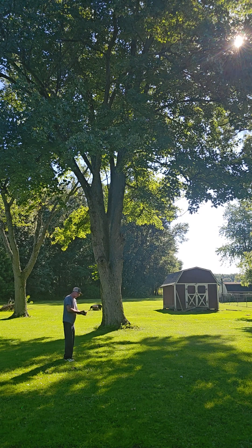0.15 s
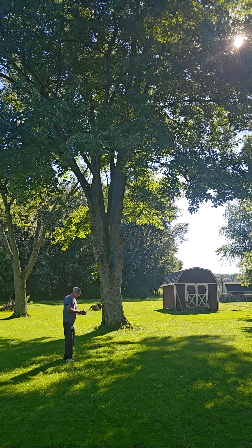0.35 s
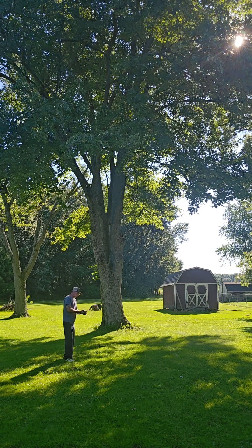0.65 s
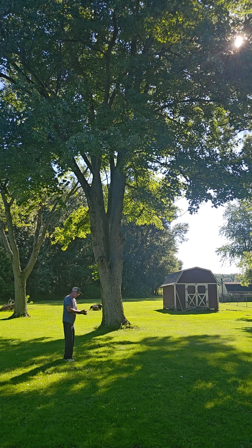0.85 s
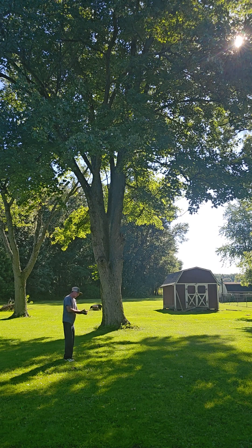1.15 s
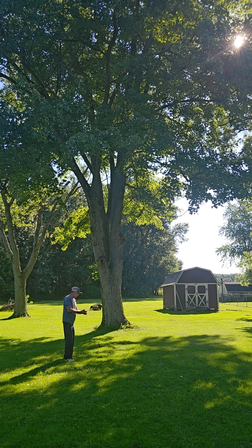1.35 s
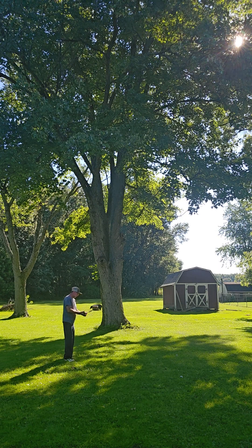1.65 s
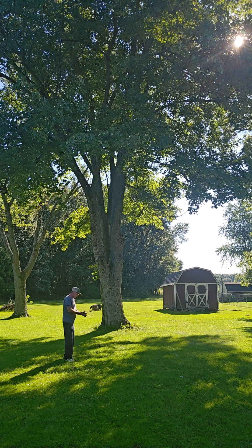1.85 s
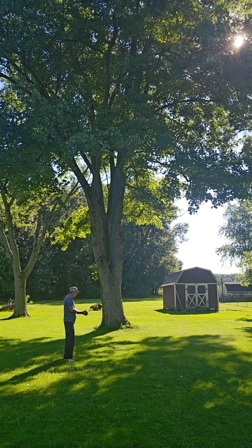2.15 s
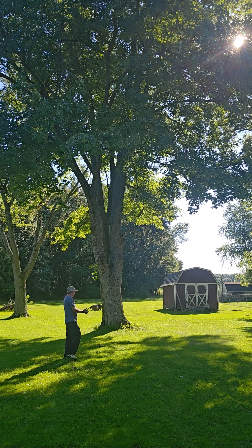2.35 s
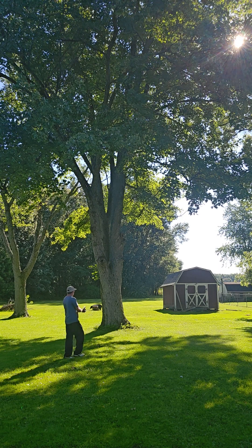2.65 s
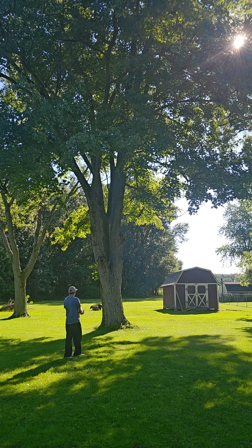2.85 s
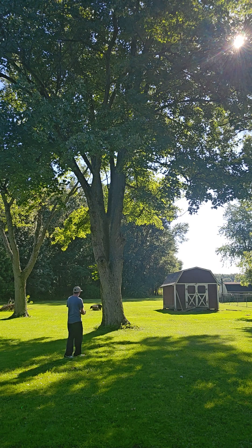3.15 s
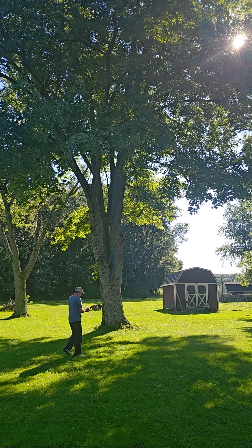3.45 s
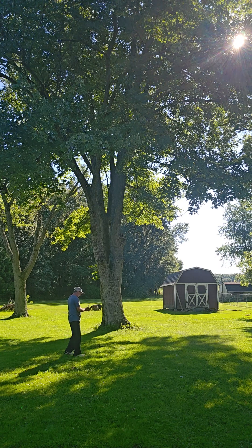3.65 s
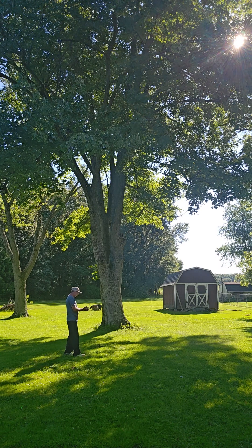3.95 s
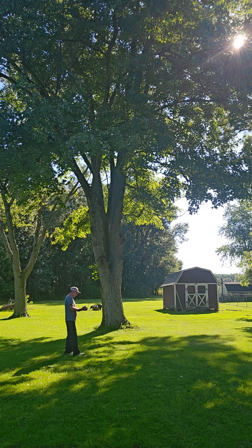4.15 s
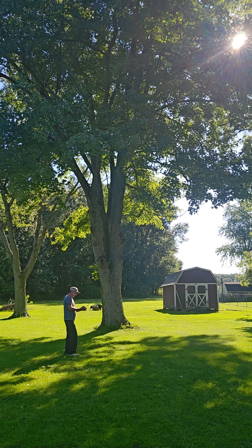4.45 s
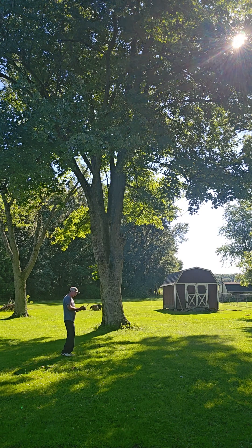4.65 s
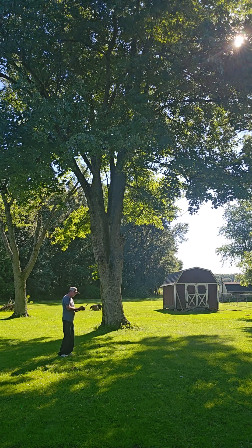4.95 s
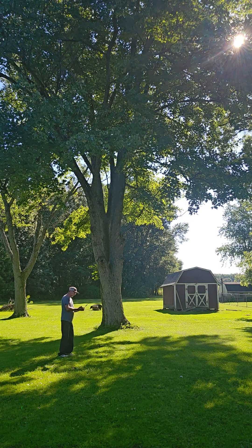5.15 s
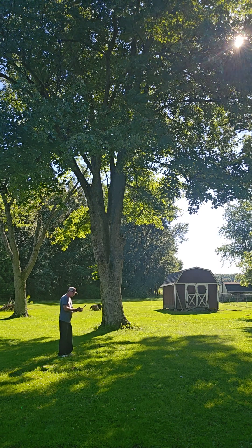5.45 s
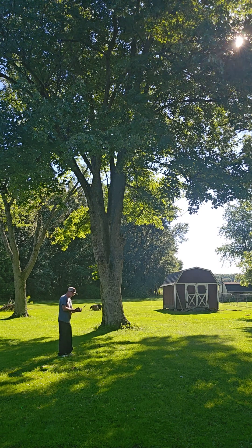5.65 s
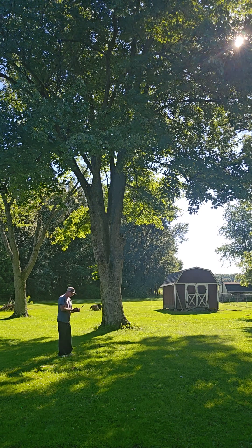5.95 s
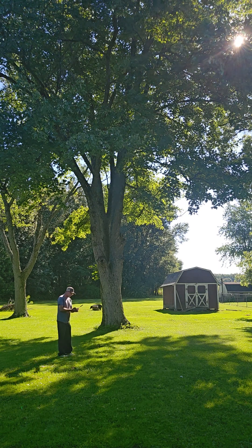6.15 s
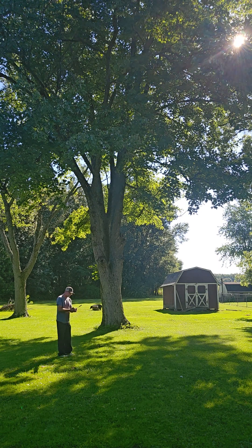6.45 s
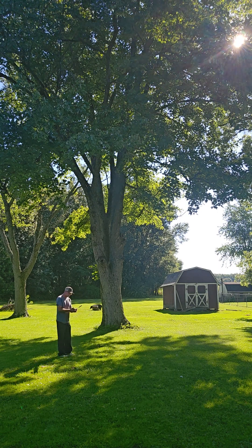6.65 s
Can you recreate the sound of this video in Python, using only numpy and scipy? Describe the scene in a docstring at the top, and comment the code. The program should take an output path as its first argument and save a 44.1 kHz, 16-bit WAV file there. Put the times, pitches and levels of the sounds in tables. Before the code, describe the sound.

A man on a tree-shaded lawn strokes a turkey pot call some metres from the microphone. Short high whistles drop into increasingly raspy yelps in the first second and a half; after a gap comes one rough yelp, then several faint, clear whistles. Lawn and trees return a light echo. Underneath lie quiet low air rumble, a wavering distant engine, leaf and cricket hiss and tiny insect ticks.

```python
"""A turkey pot call is played on a lawn, some way from the microphone: a striker sticks and slips on the plate.
Each stroke lands high and settles on a whistle; pressed harder, it drops, splits and rasps into a yelp.
It rises again as the tip lifts; lawn and trees answer with decaying noise echoes.
Wavering sines make a distant engine drone; coloured noise makes the rumble, the leaves and the insects,
which sizzle and tick in the grass."""
import sys
import numpy as np
from scipy import signal
from scipy.fft import rfft, irfft, next_fast_len
from scipy.io import wavfile
from scipy.ndimage import uniform_filter1d, map_coordinates

SR = 44100
rng = np.random.default_rng(int(sys.argv[2]) if len(sys.argv) > 2 else 0)


def wav_out(sig):
    """Save sig, one row per channel (or a flat mono array), as 16-bit PCM at SR to the path in sys.argv[1]."""
    wavfile.write(sys.argv[1], SR, np.round(np.clip(np.atleast_2d(sig).T, -1, 1) * 32767).astype(np.int16))


N = 299437
TIME = np.arange(N) / SR  # s


def amp(db):
    """Decibels to gain."""
    return 10 ** (np.asarray(db) / 20)


def unit(x):
    """Scaled to rms 1."""
    return x / np.sqrt(np.mean(x ** 2) + 1e-20)


def along(points, hz):
    """(frequency, value) points read on a log frequency axis."""
    f, v = np.transpose(points)
    return np.interp(np.log(hz + 1), np.log(f + 1), v)


def lookup(rows, x):
    """Each later column of a table, read where its first column equals x."""
    first, *cols = np.transpose(rows)
    return [np.interp(x, first, col) for col in cols]


def wobble(rate):
    """A smooth random curve, rate knots a second."""
    knots = rng.standard_normal(int(N * rate / SR) + 4)
    return map_coordinates(knots, [TIME * rate])


def filtered(x, response):
    """x passed through a complex response of frequency."""
    size = next_fast_len(N + SR // 2)
    spectrum = rfft(x, size) * response(np.fft.rfftfreq(size, 1 / SR))
    return irfft(spectrum, size)[..., :N]


def tone(hz):
    """A sine of rms 1 that follows a pitch curve."""
    cycles = np.cumsum(hz) / SR + rng.random()
    return np.sqrt(2) * np.sin(2 * np.pi * cycles)


def rush(spectrum):
    """Coloured stereo noise of rms 1: a mid and a side noise share the power by left-right likeness."""
    # likeness of the two sides: (frequency [Hz], correlation [-1 to 1])
    likeness = [(60, 0.95), (130, 0.95), (290, 0.93), (640, 0.95), (1410, 0.75), (3100, 0.082),
                (6820, -0.2), (15000, 0.75)]

    def mid_and_side(hz):
        turn = np.arccos(np.clip(along(likeness, hz), -1, 1)) / 2
        return amp(along(spectrum, hz)) * np.array([np.cos(turn), np.sin(turn)])

    mid, side = filtered(rng.standard_normal((2, N)), mid_and_side)
    return unit(np.array([mid + side, mid - side]))


def bouts(rows, rest_db, edge_s):
    """A level in dB that rises from rest during each (start, end, level) row, with soft edges."""
    level = rest_db
    for start, end, db in rows:
        inside = (np.tanh((TIME - start) / edge_s) - np.tanh((TIME - end) / edge_s)) / 2
        level = level + (db - rest_db) * inside
    return level


def far_air(level_db=-53):
    """Far traffic and breeze: low noise whose level drifts slightly."""
    # colour of the far air: (frequency [Hz], relative density [dB per Hz])
    air_colour = [(12, -31.5), (20, -14.5), (49, -2.5), (97, -2), (124, -9), (138, -6), (155, -7),
                  (166, -5.5), (183, -16), (208, -15.5), (224, -31), (414, -27.5), (446, -23), (855, -17.5),
                  (1700, -31), (2210, -60.5), (3740, -120)]
    return amp(level_db + 0.6 * wobble(9.2)) * rush(air_colour)


def rumble(rest_db=-70, trim_db=-4):
    """A low rumble: narrow bands of noise that swell now and then."""
    # swells, before the trim: (start [s], end [s], level [dB])
    rumble_swells = [(.55, 1.4, -58.5), (2.33, 2.65, -57.5), (4.4, 4.65, -64)]
    # colour: (frequency [Hz], relative density [dB per Hz])
    rumble_colour = [(165, -22.5), (198, 2), (240, -7), (320, -13), (430, -4), (520, -25), (1200, -90)]
    level_db = bouts(rumble_swells, rest_db, edge_s=.07) + 1.5 * wobble(4) + trim_db
    return amp(level_db) * rush(rumble_colour)


def leaves(level_db=-65.5, pan_db=1.0):
    """Leaves and crickets: a soft, slowly drifting hiss, a little stronger on the left."""
    # colour: (frequency [Hz], relative density [dB per Hz])
    leaf_colour = [(1000, -27), (1700, -25), (2050, -3.5), (2220, -6.5), (2430, -14), (3310, -10.5),
                   (3930, -10), (4520, -7), (4870, 1), (5650, 4), (6750, -3), (8880, -6), (10000, -47),
                   (13000, -45), (15500, -48), (22000, -120)]
    hiss = amp(level_db + .6 * wobble(1.8)) * rush(leaf_colour)
    return hiss * amp([[pan_db], [-pan_db]])


def engine(drone_hz=153.3, rest_db=-65, trim_db=-1):
    """A far engine: one wavering low tone that swells, over other low tones that drift without set swells."""
    # swells of the main tone, before the trim: (start [s], end [s], level [dB])
    drone_swells = [(-.2, .3, -54), (1.12, 2.03, -52.5), (2.55, 3.0, -53), (3.2, 3.95, -51.5),
                    (4.35, 5.98, -54)]
    # other low tones, each drifting about: (frequency [Hz], level [dB])
    drone_lines = [(54.5, -62), (109, -60.5), (196.5, -68.5)]
    lines = sum(amp(level + 3.5 * wobble(2.7)) * tone(f * (1 + .008 * wobble(3.7)))
                for f, level in drone_lines)
    drone_db = bouts(drone_swells, rest_db, edge_s=.08) + trim_db
    drone = amp(drone_db) * tone(drone_hz * (1 + .004 * wobble(4)))
    return drone + lines


def insects(rest_db=-84, sizzle_trim_db=-1, pulse_hz=33, tick_trim_db=-8, tick_s=.007):
    """A pulsing high sizzle of wings, with a few louder single strokes, all cut from one high noise."""
    # bouts of song, before the trim: (start [s], end [s], level [dB])
    sizzle_bouts = [(.1, 1.2, -78), (2.65, 3.85, -72), (3.85, 4.95, -78), (5.7, 7, -72)]
    # ticks, before the trim; each peaks tick_s after its time: (time [s], level [dB])
    tick_times = [(2.2568, -57), (2.4631, -59), (5.5263, -61.5), (5.6228, -54), (5.7125, -57),
                  (5.7938, -62.5)]
    # colour: (frequency [Hz], relative density [dB per Hz])
    insect_colour = [(9500, -26), (10800, -6), (12300, 4), (13800, -3), (15600, -14)]
    pulse = 1 + 0.3 * tone(pulse_hz * (1 + 0.12 * wobble(11)))
    sizzle = amp(bouts(sizzle_bouts, rest_db, edge_s=.15) + sizzle_trim_db) * pulse
    ticks = sum(amp(db + tick_trim_db) * np.exp(-((TIME - s - tick_s) / tick_s) ** 2)
                for s, db in tick_times)
    return (sizzle + ticks) * rush(insect_colour)


def yard(x, near_db=-18, near_t60=0.19, far_db=-28.5, patchy_db=3, treeline_s=0.45, treeline_db=7):
    """Quick scatter from the lawn and trunk, then a faint long answer from the trees, as decaying noise."""
    # decay of the far answer: (frequency [Hz], time to fall 60 dB [s])
    far_decay = [(300, 0.32), (1100, 1.1), (2200, 1.65), (4200, 1.35), (9000, 0.81)]
    hz, frames, z = signal.stft(rng.standard_normal((2, SR * 3 // 2)), SR, nperseg=256)
    fading = amp(-60 * frames / along(far_decay, hz)[:, None])
    far = signal.istft(z * fading, SR, nperseg=256)[1]
    t = np.arange(far.shape[1]) / SR
    # the far answer is patchy, rising and falling at random, and the far tree line adds one late swell
    treeline = treeline_db * np.exp(-((t - treeline_s) / 0.097) ** 2)
    lumps_db = patchy_db * wobble(25)[:len(t)] + treeline
    far = far * (1 - np.exp(-t / 0.02027)) * amp(lumps_db)
    near = rng.standard_normal(far.shape) * amp(-60 * t / near_t60) * (1 - np.exp(-t / 0.0097))
    near = amp(near_db) * near / np.linalg.norm(near[0])
    far = amp(far_db) * far / np.linalg.norm(far[0])
    return signal.fftconvolve(x[None], near + far, axes=1)[:, :N]


def placed(x):
    """The direct sound reaches the two microphone ports at different times and strengths."""
    # phase between the ports: (frequency [Hz], lead of the left [rad])
    left_lead = [(1300, 0.68), (1650, 1.3), (1950, -1.07), (2350, -1.55), (3000, -1.5), (3900, -1.5),
                 (5300, -2.5), (8000, -2)]
    # level between the ports: (frequency [Hz], left minus right [dB])
    left_tilt = [(700, -1), (1250, -1.8), (2050, 5), (2500, 5), (4000, 0), (8000, -.5)]
    side = np.array([[1], [-1]]) / 2
    return filtered(x, lambda hz: amp(side * along(left_tilt, hz)) * np.exp(1j * side * along(left_lead, hz)))


def grazes():
    """Faint unsteady squeaks as the tip barely grazes the plate."""
    # squeaks, before the pot rings: (centre [s], half length [s], pitch [Hz], level [dB])
    squeaks = [(3.922, 0.011, 2234, -68), (4.043, 0.027, 1340, -66), (5.336, 0.038, 1410, -64)]
    return sum(amp(db) * np.exp(-((TIME - s) / length) ** 2) * tone(hz * (1 + 0.0112 * wobble(250)))
               for s, length, hz, db in squeaks)


def ringing(x):
    """Modes store energy as the pitch slides across them, beat against it and ring out."""
    # modes of plate and pot: (frequency [Hz], width [Hz], level against the direct sound [dB])
    pot_modes = [(1033, 22, -12.5), (1177, 8.3, -13.5), (1495, 14, -10.5), (2166, 22, -7.5),
                 (2376, 25, -4.5), (4150, 40, 0)]

    def response(f):
        return 1 + sum(amp(db) * 1j * f * w / (c * c - f * f + 1j * f * w) for c, w, db in pot_modes)

    return filtered(x, response)


def plate_voice(whistle, rasp, centre_hz=2250, width_hz=270, rough_share=0.39):
    """The plate's main resonance: a whistle, mixed under pressure with its answer to uneven slips."""
    noise = rng.standard_normal(N)
    rattle = unit(filtered(noise, lambda hz: 1 / (1 + (2 * (hz - centre_hz) / width_hz) ** 4)))
    share = np.clip(rough_share * rasp ** 2, 0, 1)
    return np.sqrt(1 - share) * whistle + np.sqrt(share) * rattle


def stroke_controls(smooth_s=.002):
    """Pressure and contact set each stroke's slip rate, which in turn sets strength and roughness."""
    # strokes of the striker; levels are relative drives:
    # (start [s], end [s], landing glide [s], bite time [s], bite length [s], swell time [s],
    #  slip rate of the whistle [Hz], bitten slip rate [Hz], level [dB], swell [dB],
    #  fundamental [dB], overtones [dB], grip [0-1], tendency to triple [0-1])
    strokes = [(-0.06, 0.038, 0.01, -0.02, 0.007, -0.008, 1195.0, 1188.0, -31.5, 1.6, 2.4, 4.8, 0.5, 0.2),
               (0.183, 0.366, 0.007, 0.289, 0.005, 0.297, 1179.0, 1170.0, -28.0, 3.6, 2.7, 2.3, 0.12, 0.15),
               (0.511, 0.66, 0.007, 0.543, 0.003, 0.592, 1166.0, 1066.0, -27.1, 4.5, 2.0, 1.2, 1.0, 0.25),
               (0.822, 0.968, 0.011, 0.888, 0.015, 0.869, 1166.0, 1009.0, -24.3, 2.3, -0.5, 0.7, 0.9, 0.4),
               (1.187, 1.331, 0.002, 1.226, 0.012, 1.216, 1178.0, 1013.0, -23.6, -1.2, -2.7, -2.1, 0.9, 0.3),
               (2.3, 2.443, 0.006, 2.331, 0.004, 2.391, 1206.0, 1081.0, -31.0, 14.1, 2.0, 6.8, 1.0, 1.0),
               (4.043, 4.202, 0.03, 4.149, 0.003, 4.13, 1172.0, 1112.0, -39.9, 3.4, -2.4, -1.3, 0.05, 0.0),
               (4.402, 4.487, 0.02, 4.469, 0.007, 4.448, 1163.0, 1174.0, -37.4, 2.7, 5.9, 2.5, 0.05, 0.0),
               (4.459, 4.591, 0.015, 4.506, 0.006, 4.544, 1190.0, 1112.0, -34.3, 0.8, 1.3, 2.2, 0.06, 0.0),
               (5.369, 5.577, 0.017, 5.455, 0.009, 5.555, 1230.0, 1165.0, -35.8, 6.4, 0.0, 1.9, 0.03, 0.0),
               (5.727, 5.907, 0.047, 5.82, 0.007, 5.843, 1190.0, 1194.0, -33.5, 6.0, -3.0, 2.9, 0.03, 0.0),
               (6.101, 6.337, 0.021, 6.234, 0.005, 6.302, 1192.0, 1095.0, -40.2, 4.0, 1.2, 10.6, 0.02, 0.0)]
    # strength of each voice against the stroke's level:
    # (slip rate [Hz], plate tone [dB], fundamental [dB], overtones [dB])
    voice_strengths = [(1010, -10.3, -23.6, -12.2), (1060, -2.8, -21.6, -13.8), (1090, 1.2, -23.1, -16.2),
                       (1125, -0.7, -29.7, -21.8), (1160, -0.0, -23.9, -26.1), (1190, -4.5, -33.8, -26.7),
                       (1230, -14.1, -31.9, -30.6), (1300, -13.7, -33.3, -35.0),
                       (1400, -34.3, -27.7, -41.1)]
    # more pressure slows the slips and breaks them up:
    # (slip rate [Hz], rasp [0-1], period doubling [0-1], period tripling [0-1])
    slip_breakup = [(1020, .25, 1, .05), (1045, .25, .97, .15), (1072, .7, .72, .8), (1115, .55, .3, .7),
                    (1160, .1, .12, .3), (1185, .02, .2, .12), (1300, .04, .02, .2)]
    land_hz, lift_hz = 1390, 1300  # slip rate of the barely touching tip
    attack_s, lift_s, swell_s, release_s = .005, .0143, .0213, .0055
    lift_db = -7  # the plate tone weakens as the tip leaves it
    low_grows, upper_grows = .677, .53  # fundamental per dB of level, overtones per dB of swell
    # the tip skids, louder and rougher, just before it lifts
    skid_before_s, skid_s, skid_rasp, skid_db = .026, .007, .55, 3

    t = TIME
    rows = np.array(strokes)
    nearest = np.minimum(t - rows[:, :1], rows[:, 1:2] - t).argmax(axis=0)
    (start, end, glide, bite, bite_s, peak, whistle_hz, bitten_hz,
     level_db, swell_db, low_db, upper_db, grip, triple) = rows[nearest].T

    # slip rate: lands high, holds, shifts at the bite, rises at the lift
    bitten = (1 + np.tanh((t - bite) / (2 * bite_s))) / 2
    held = whistle_hz + (bitten_hz - whistle_hz) * bitten
    landing = np.exp(-(np.maximum(t - start, 0) / glide) ** 2)
    lifting = np.exp(-np.maximum(end - t, 0) / lift_s)
    pitch = held + (land_hz - held) * landing + (lift_hz - held) * lifting

    # strength: attack, hold with one swell, a last skid, release
    attack = (1 + np.tanh((t - start - attack_s) / (2 * attack_s))) / 2
    release = (1 + np.tanh((end - t) / (2 * release_s))) / 2
    swell = swell_db * np.exp(-((t - peak) / swell_s) ** 2)
    skid = np.exp(-((end - skid_before_s - t) / skid_s) ** 2)
    firmness = np.sqrt(np.abs(grip))
    drive_db = np.array([level_db + swell + skid_db * firmness * skid + lift_db * lifting,
                         low_grows * level_db + low_db,
                         level_db + upper_grows * swell + upper_db])
    strengths = attack * release * amp(drive_db + lookup(voice_strengths, pitch))
    strengths = uniform_filter1d(strengths, max(1, round(smooth_s * SR)), axis=1)

    # a firm grip roughens the stroke; in a swell the plate pulls the slips back into step
    rasp, split, third = lookup(slip_breakup, pitch)
    rasp = grip * (rasp * amp(-swell) + skid_rasp * skid)
    return pitch, *strengths, *np.clip([rasp, firmness * split, triple * third], 0, 1)


def pot_call(jitter=0.013, chatter=0.61, chatter_rate=380, judder_hz=76, judder=0.47,
             plate_db=-1.2, flutter_db=1, low_db=-1.6, split_db=2, halves_db=-1, upper_db=-.3,
             scrape_db=-2.6, flicker_db=4.6, clump_db=3.5, damping_db=7, plate_top_hz=2570):
    """Stick-slip harmonics; the second one sits on the plate's main resonance."""
    # how the pot radiates the overtones: (frequency [Hz], relative level [dB])
    pot_radiation = [(2600, 2.5), (3050, -9), (3300, -13), (3520, -11), (3800, 0), (3950, -5.5), (4130, 9),
                     (4380, -6), (4780, 1), (5150, -10.5), (5490, 0), (5950, -10), (6600, -12), (7600, -23)]
    # gritty scrape of the striker tip: (frequency [Hz], relative density [dB per Hz])
    scrape_colour = [(200, -23.5), (600, -27), (950, -1), (1450, -1), (1720, -18), (2200, -0.5), (2850, 0),
                     (3400, -3.5), (3750, 2), (4100, 3), (5000, -2.5), (6500, -12.5), (9500, -31.5),
                     (12000, -25.5), (15500, -30)]
    pitch, plate, low, upper, rasp, split, third = stroke_controls()

    # under pressure the slips come unevenly, in time and in size, and the striker shaft judders
    pitch = pitch * (1 + jitter * rasp * wobble(350) + .002 * wobble(120))
    shake = chatter * rasp
    shaft = 1 + judder * rasp ** 2 * tone(judder_hz * (1 + 0.14 * wobble(30)))

    def partial(k):
        uneven = (1 + shake * wobble(chatter_rate)) / np.sqrt(1 + shake ** 2)
        return shaft * tone(k * pitch) * uneven

    # the plate's swing may repeat only every third or fourth cycle, which adds lines below it
    every_third, every_fourth = partial(4 / 3), partial(3 / 2)
    fundamental = np.sqrt(1 - third ** 2) * shaft * tone(pitch) + third * every_third
    below = amp(low_db) * fundamental + amp(split_db) * (1 - third) * split ** 3 * every_fourth

    # alternate strong and weak slips put lines halfway between the harmonics
    orders = np.arange(5, 15) / 2
    gains = []
    for k in orders:
        db = along(pot_radiation, k * pitch) + flicker_db * rasp ** .25 * wobble(70)
        if k >= 5:  # the pressed tip damps the highest ones
            db = db - damping_db * np.sqrt(split)
        halfway = amp(halves_db) * split if k % 1 else 1
        gains.append(amp(db) * halfway)
    overtones = sum(g * partial(k) for k, g in zip(orders, gains)) / np.linalg.norm(gains, axis=0)

    clumps = rng.standard_normal(N) * amp(clump_db * wobble(250))
    grit = unit(filtered(clumps, lambda hz: amp(along(scrape_colour, hz))))
    scrape = np.sqrt(np.maximum(rasp, third ** 2)) * shaft * grit
    above = amp(upper_db) * np.sqrt(1 - third) * overtones + amp(scrape_db) * scrape

    # as the tip lands and lifts the slip rate shoots up, and the plate cannot follow all the way
    lock = np.minimum(1, plate_top_hz / (2 * pitch))
    plate_tone = plate_voice(partial(2 * lock), rasp)
    return amp(plate_db + flutter_db * wobble(65)) * plate * plate_tone + low * below + upper * above


def scene():
    """The call, direct and echoed by the yard, over engine, insects and outdoor air."""
    background = far_air() + rumble() + leaves() + engine() + insects()
    call = ringing(pot_call() + grazes())
    return background + yard(call) + amp(1.93) * placed(call)


def record(dry, top_hz=15700):
    """The microphone keeps nothing above its band limit."""
    return filtered(dry, lambda hz: hz < top_hz)


dry = scene()
out = record(dry)
wav_out(out)
```